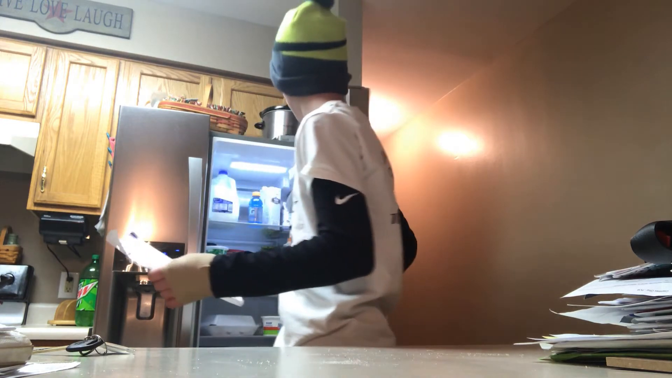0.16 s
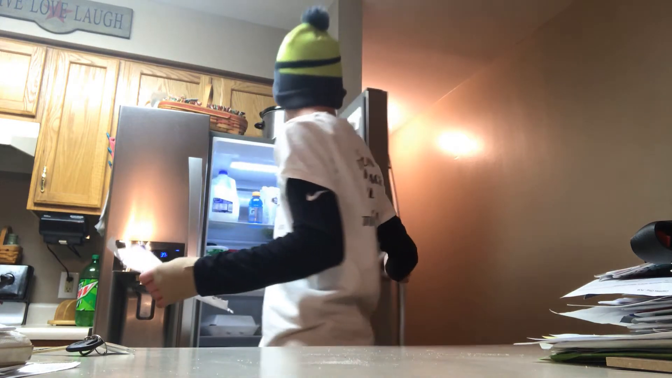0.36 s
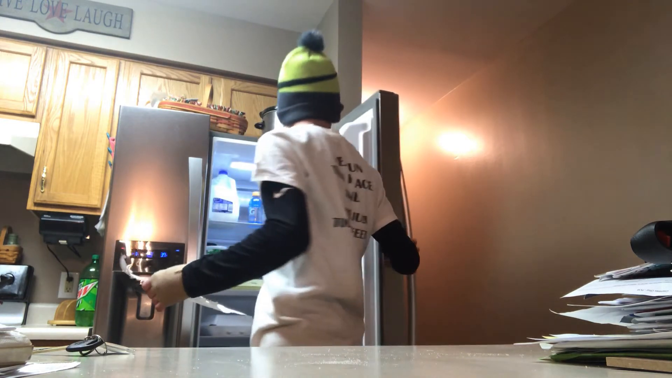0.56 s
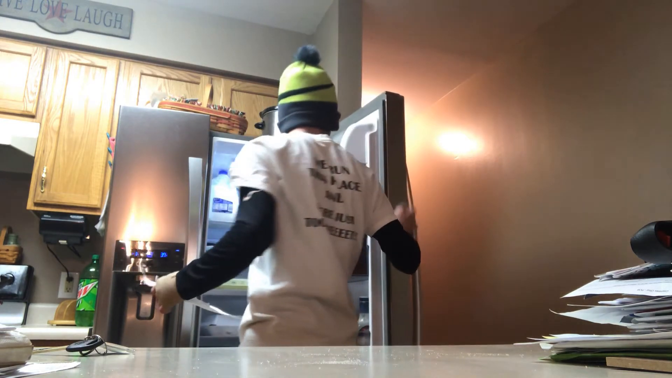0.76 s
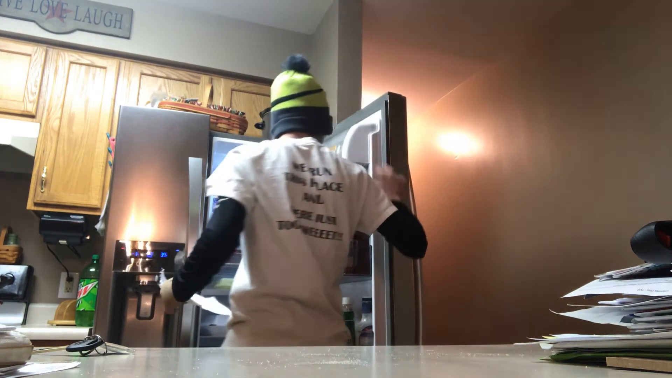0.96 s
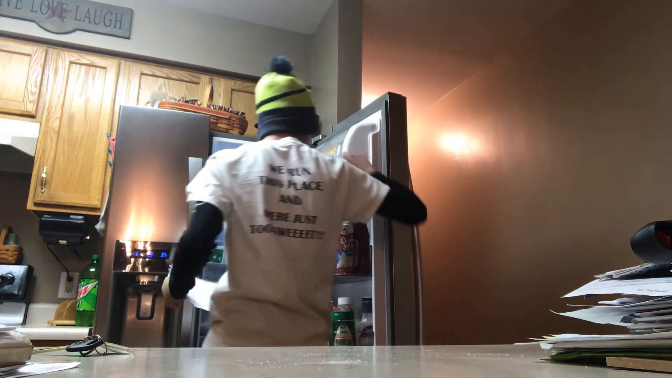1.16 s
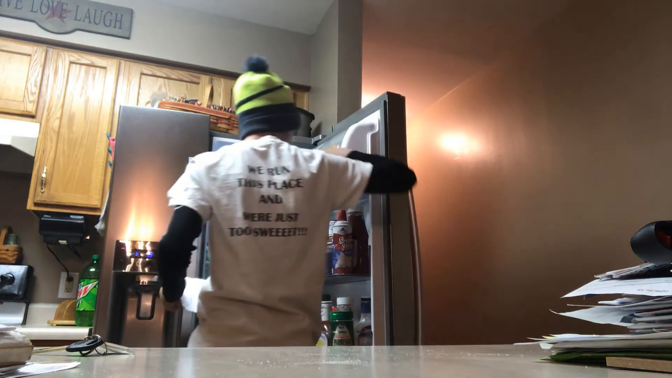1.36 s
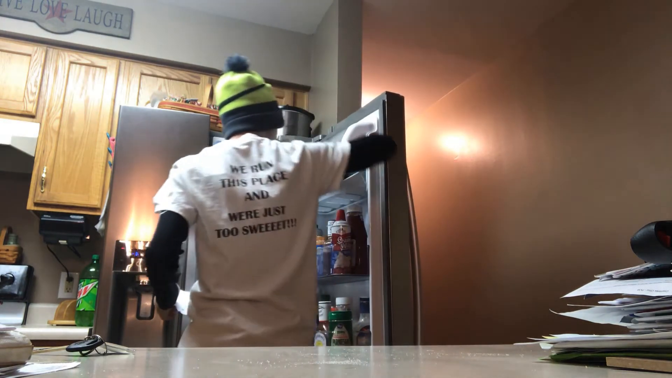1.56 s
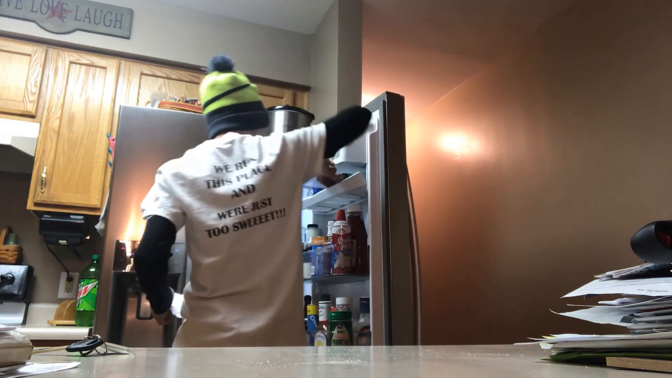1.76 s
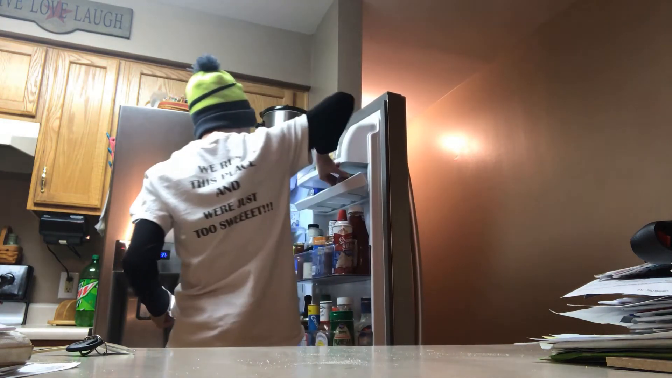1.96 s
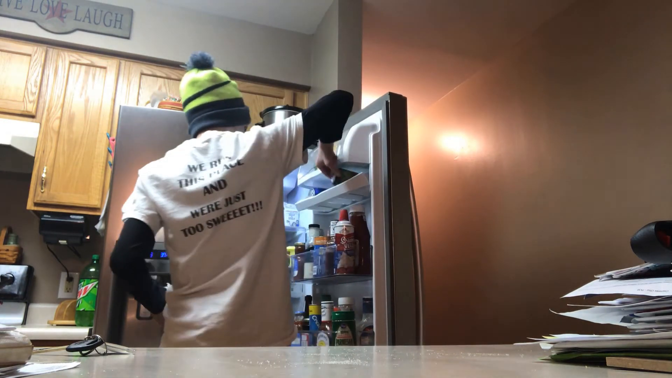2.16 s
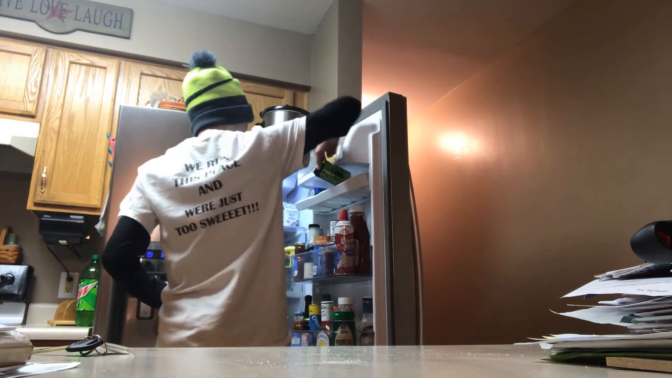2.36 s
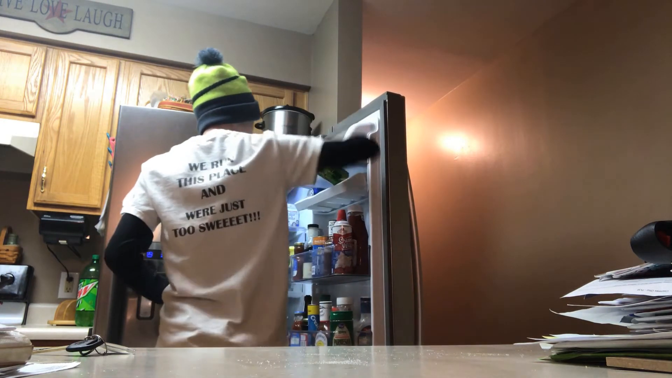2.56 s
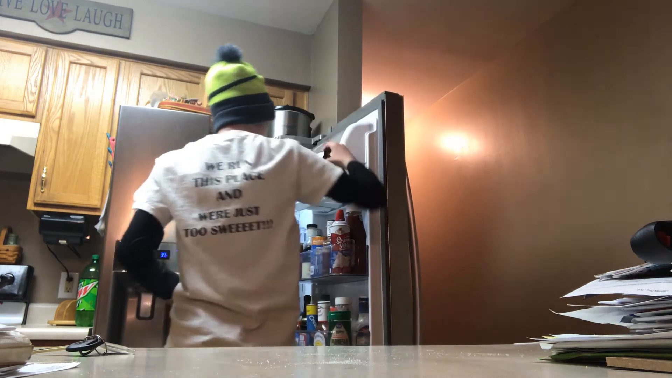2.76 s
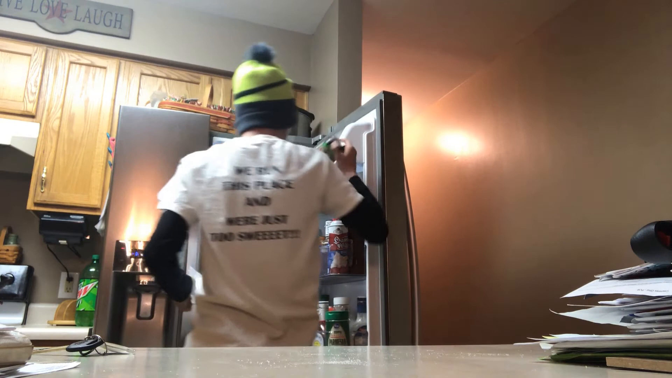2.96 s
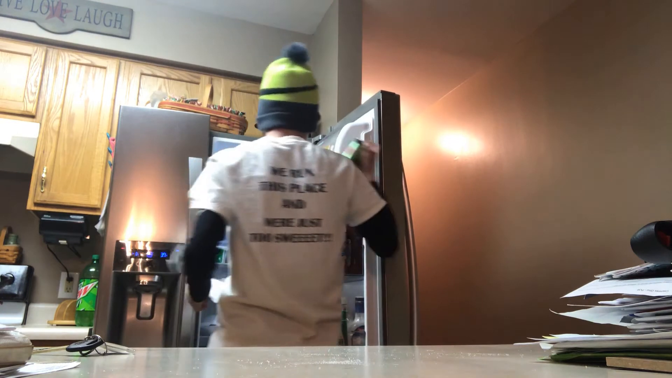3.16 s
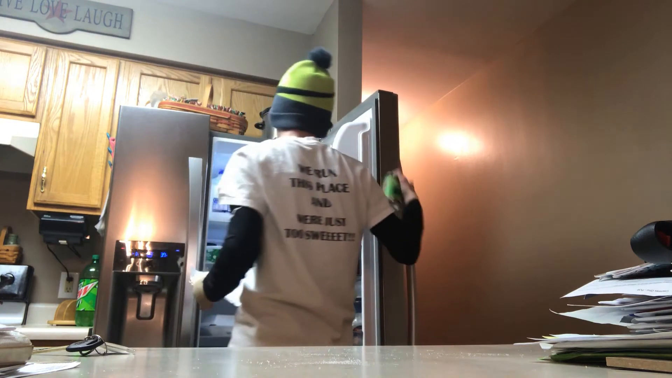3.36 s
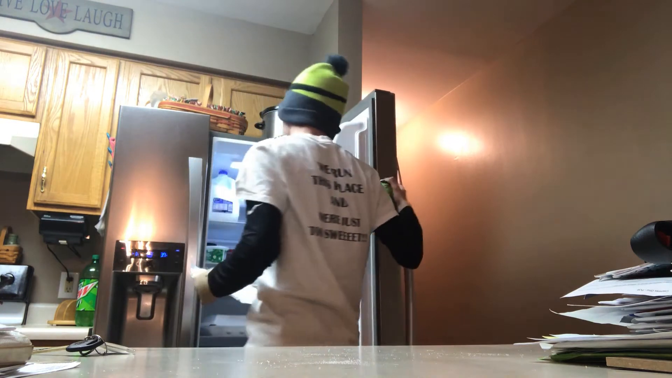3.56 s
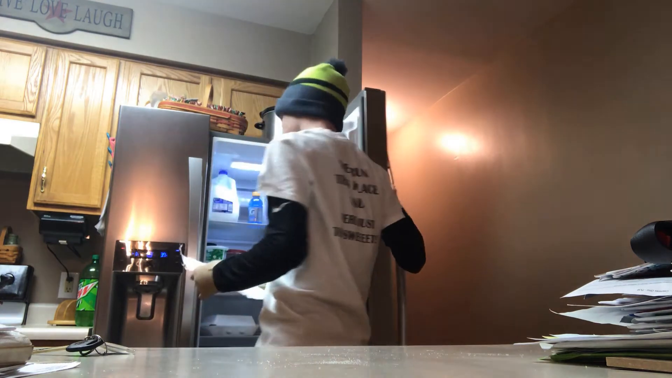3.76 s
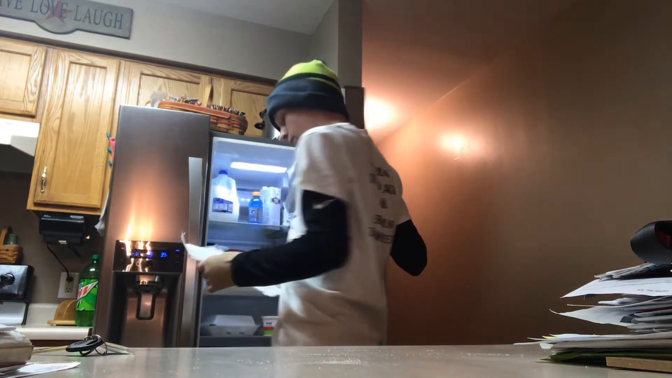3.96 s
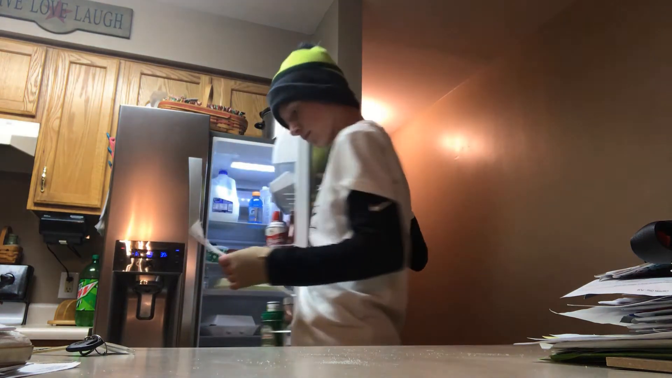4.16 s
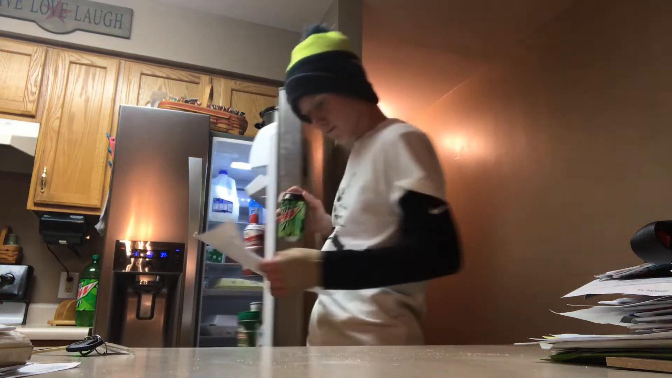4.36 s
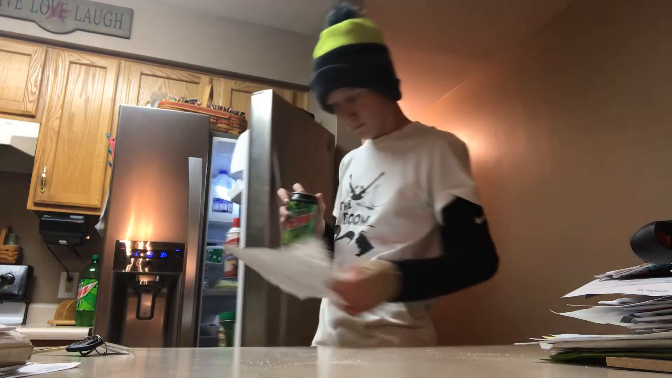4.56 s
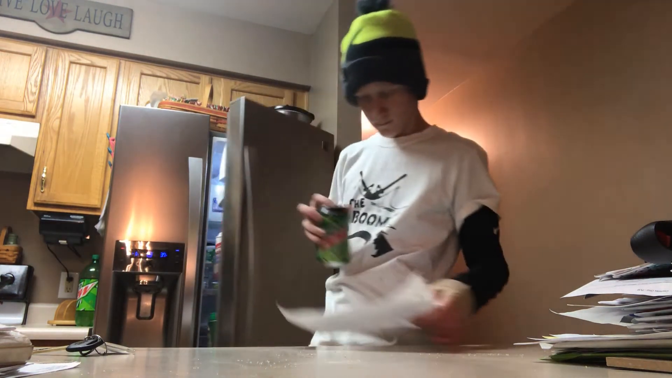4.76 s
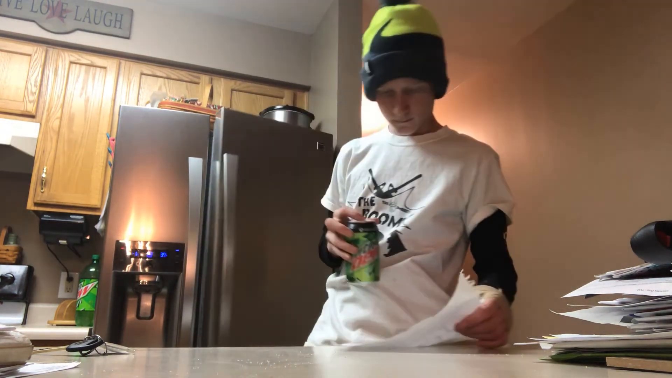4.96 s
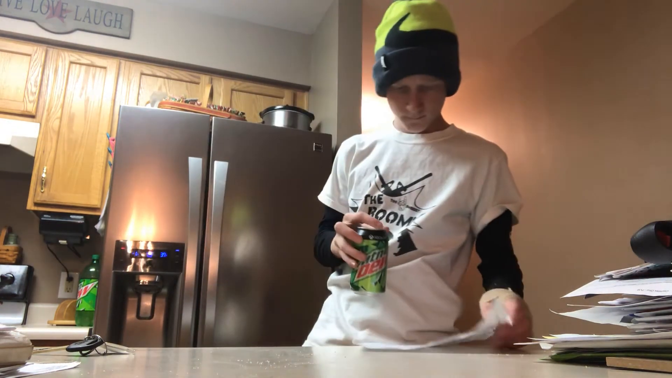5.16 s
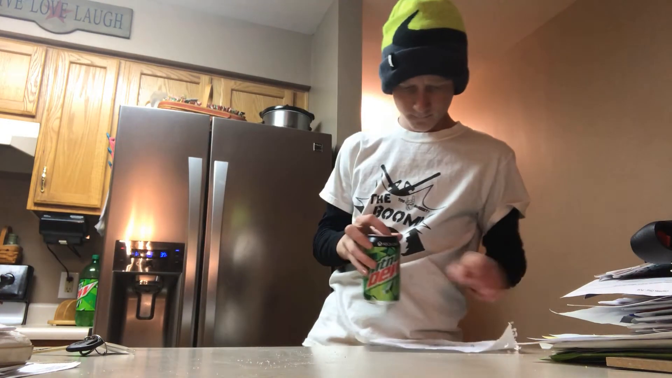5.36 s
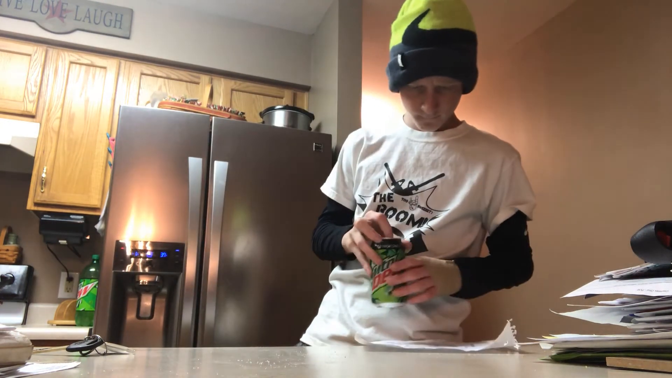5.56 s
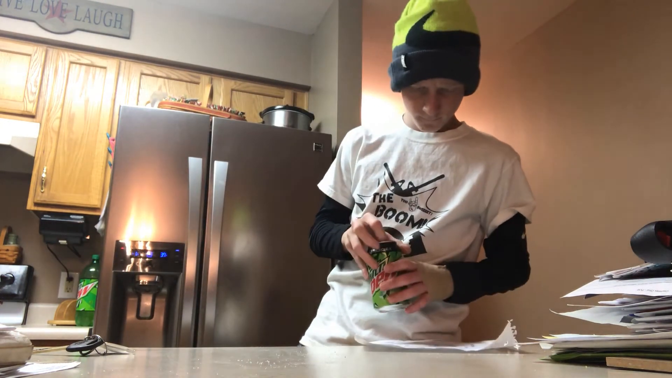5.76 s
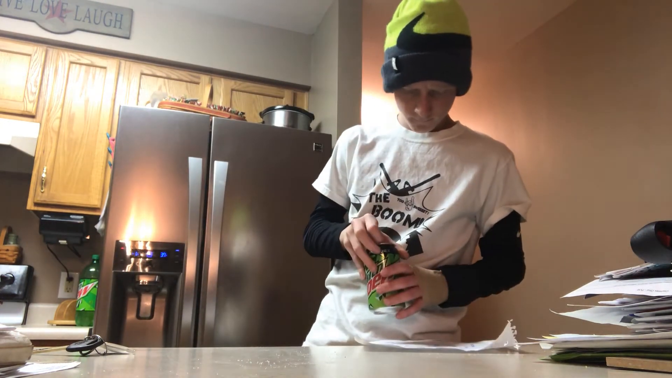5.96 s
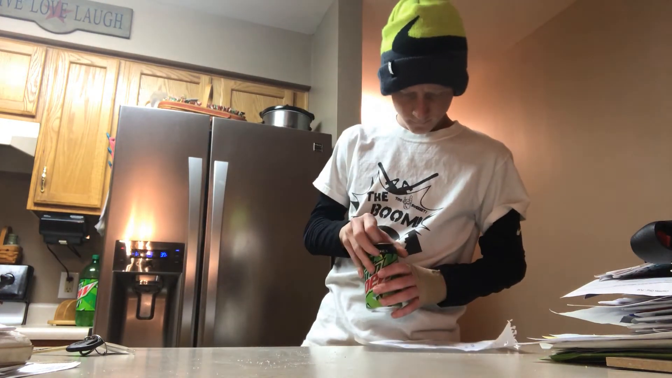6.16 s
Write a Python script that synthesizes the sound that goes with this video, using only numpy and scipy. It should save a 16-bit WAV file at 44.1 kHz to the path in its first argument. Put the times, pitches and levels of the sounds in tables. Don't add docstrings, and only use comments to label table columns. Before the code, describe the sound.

In a quiet home kitchen, faint steps and sleeve rustle lead to hollow plastic knocks as a can is pulled from a refrigerator door rack. A single shelf knock follows, then quiet handling and a paper snap. The door claps shut with a low thump, shelves and bottles rattling on. Close to the microphone, a can tab cracks sharply, hisses briefly and pops.

```python
import sys
import numpy as np
from scipy import signal
from scipy.fft import rfft, irfft, next_fast_len
from scipy.io import wavfile
from scipy.ndimage import map_coordinates

SR = 44100
rng = np.random.default_rng(int(sys.argv[2]) if len(sys.argv) > 2 else 0)


def rack_gain(trim_db):
    fader = np.asarray(trim_db, float)
    return 10 ** (fader / 20)


def wav_record(signal):
    frames = np.transpose(np.atleast_2d(signal))
    bounded = np.clip(frames, -1, 1)
    quanta = np.round(bounded * 32767).astype(np.int16)
    wavfile.write(sys.argv[1], SR, quanta)


N = 273464

# frequency_hz, density_db_per_hz
HUSH_SPECTRUM = [(15, -41), (25, 4.5), (97, 5.5), (161, -17.5), (545, -21.5), (641, -33), (1230, -5.5),
                 (1740, -18.5), (3450, -37), (5430, -28), (16000, -37)]
# start_s, level_db, pitch_hz, decay_t60_s
FOOTFALLS = [(0.015, -68, 79.5, .3), (0.204, -55, 38, .3), (0.451, -57, 60, .35), (0.961, -66, 60, .3),
             (1.205, -59, 56, 0.33), (2.959, -58, 49.6, .45), (3.457, -54, 68, 0.39),
             (3.886, -60, 61, 0.44), (4.15, -65, 122, 0.33), (4.735, -65, 71.6, 0.27),
             (4.872, -62, 96, .26)]
# peak_s, level_db, rise_s, fall_s, brightness_db
STROKES = [(0.02, -74.5, 0.091, 0.17, -10), (0.45, -74.5, 0.086, 0.13, 3), (1.02, -63.5, 0.11, 0.11, 6),
           (1.33, -70.5, 0.11, 0.32, 2.5), (1.85, -67.5, 0.17, 0.078, -5), (2.15, -54.5, .03, 0.2, 0),
           (2.37, -53.5, 0.18, 0.061, -1), (3.02, -63, 0.25, 0.24, 1), (3.49, -79, 0.052, 0.087, -13),
           (3.63, -66.5, 0.048, 0.065, 8.5), (4.68, -71.5, 0.25, 0.072, -12), (4.94, -62, 0.12, 0.66, -5.5),
           (5.06, -65, 0.072, 0.78, -11)]
# rest_db, gain_re_stroke_db, brightness_share, slam_rattle_db, rattle_fall_db_per_s
RUB_LAYERS = [
    (-77.5, -14, -0.68, -53.5, 15),
    (-78.5, -1, -0.26, -41, 31.5),
    (-79, -3, 0.82, -43.5, 45.5),
    (-78, -7.5, 0.94, -61, 58),
]
# frequency_hz, density_db_per_hz
RUMBLE_SPECTRUM = [(20, -36), (54, -2.5), (81, -1.5), (113, -2), (200, -3.5), (260, -16), (440, -120)]
PLASTIC_SPECTRUM = [(59, -50), (144, -8.5), (235, 3.5), (280, -5), (333, -1), (482, -5.5), (900, -9),
                    (1170, -28), (1980, -120)]
SCRAPE_SPECTRUM = [(350, -32), (600, -4), (768, -15), (870, 1), (1420, -1), (2250, -19), (4420, -25),
                   (7480, -120)]
RUSTLE_SPECTRUM = [(1180, -6.5), (2240, -8), (4380, -12.5), (7570, -17.5), (9170, -21), (10400, -21),
                   (14000, -22.5), (16000, -32.5)]
# centre_s,
# level_db, centre_hz, half_length_s
SCUFFS = [(0.05, -68, 1400, 0.026), (0.183, -64.5, 1300, 0.024), (1.86, -70, 1180, 0.048),
          (3.081, -67, 1900, 0.071), (4.193, -63.5, 1130, 0.036), (6.198, -50, 1320, 0.0079)]
# start_s, peak_db, crack_re_body_db, chatter_s
THUDS = [(0.19, -50.5, -10, 0.054), (0.218, -51, -35, 0.03), (0.351, -51.5, -21, 0.024),
         (0.452, -41, -24, 0.017), (0.736, -56, -30, 0.041), (0.965, -50, -2, 0.017),
         (1.815, -52.5, -14, 0.07), (2.633, -49, -2.5, 0.043), (2.919, -48.5, -33, 0.022),
         (3.848, -56, -32, 0.022), (4.788, -52.5, -21, 0.014)]
# start_s, peak_db, centre_hz, crack_re_body_db, chatter_s
BUMPS = [(0.889, -60, 1190, -16, 0.015), (1.029, -46, 420, -16, 0.017), (1.064, -48, 297, -17, 0.01),
         (2.059, -47.5, 1210, 1, 0.01), (2.517, -44, 1900, -15, 0.042), (2.889, -40.5, 1090, -5, .018),
         (3.433, -56.5, 563, -20, 0.01), (3.537, -48, 650, 9, 0.033), (4.641, -53, 507, -29, 0.011),
         (4.686, -47.5, 484, -2, 0.02), (5.154, -40.5, 424, -7, 0.019), (5.47, -37, 690, -25, 0.049),
         (5.648, -45, 236, -34, 0.03), (5.747, -61, 690, -27, 0.029), (5.802, -41.5, 560, -37, 0.0091)]
# start_s, level_db, pitch_hz, decay_t60_s
TOUCHES = [(0.19, -60, 420, 0.13), (0.455, -57, 348, .12), (0.74, -53, 406, 0.083),
           (0.453, -50, 1000, 0.057), (0.455, -62, 526, 0.093), (0.89, -62, 1150, .06),
           (1.003, -51, 294, 0.064), (1.03, -49, 1110, .05), (1.031, -48, 835, .05),
           (1.033, -53, 1400, 0.09), (1.062, -53, 690, .06), (1.064, -51, 1610, .05),
           (1.1656, -33, 850, 0.041), (1.166, -39, 1187, .06), (1.1683, -46, 1600, .06),
           (1.192, -30, 565, 0.11), (1.205, -38, 343, .12), (1.25, -42, 358, 0.088),
           (1.1675, -21, 562, 0.047), (1.28, -59, 1197, 0.18), (1.59, -40, 1375, 0.055),
           (1.592, -43, 974, .08), (1.592, -42.5, 654, 0.053), (1.593, -47, 1620, 0.057),
           (1.6, -51, 2130, 0.055), (1.61, -42.5, 328, 0.11), (1.752, -54, 306, 0.17),
           (1.843, -46, 347, 0.089), (1.846, -51, 950, 0.074), (1.848, -51, 1400, .06),
           (1.87, -50, 200, 0.12), (1.912, -48, 198, 0.11),
           (2.058, -49, 1520, 0.069), (2.096, -26.5, 353, 0.091), (2.1103, -32.5, 353, 0.088),
         (2.139, -33.5, 190, 0.12), (2.172, -38, 2090, .04), (2.174, -41, 2700, .05),
         (2.18, -32, 356, 0.14), (2.182, -35.5, 662, 0.18), (2.198, -35, 804, 0.094),
         (2.191, -27.5, 1390, .045), (2.192, -31, 1190, 0.072), (2.193, -29.5, 1900, 0.031),
         (2.195, -36, 352, .06), (2.22, -34.5, 183, 0.2), (2.264, -26.5, 1021, 0.18),
         (2.272, -25.5, 398, .1), (2.295, -34, 369, 0.11), (2.307, -27.5, 372.4, 0.13),
         (2.31, -30.5, 546, 0.13), (2.312, -41, 1020, 0.074), (2.515, -59, 830, 0.31),
         (2.52, -56.5, 1745, .15), (2.635, -50, 1053, 0.051), (2.649, -54.5, 238, 0.35),
         (2.907, -50, 1100, 0.09), (2.918, -50, 363.6, .35), (3.435, -61, 480, 0.12),
         (3.459, -58, 250, 0.092),
           (4.34, -62, 1250, .08), (4.43, -59.5, 1290, .06), (4.505, -61, 547, .2), (4.555, -54, 513, 0.18),
           (4.64, -55, 554, .12), (4.64, -66, 1490, .12), (4.69, -56, 950, .08), (4.788, -51.5, 517, 0.081),
           (4.788, -58, 950, .08), (4.788, -61, 1500, .15), (4.886, -51, 310, .12),
           (4.886, -42, 630, 0.054), (4.93, -58, 340, 0.18), (4.69, -49, 520, 0.14), (4.53, -59, 350, .2),
           (5.05, -49, 330, .1), (5.085, -54, 530, 0.17), (5.2032, -15, 2250, .014),
           (5.2036, -14.5, 2640, 0.013), (5.2035, -24, 823, 0.028), (5.2115, -23.5, 800, 0.028),
           (5.214, -17, 2680, .015), (5.152, -46, 560, .07), (5.17, -47, 292, .1), (5.182, -42, 950, 0.058),
           (5.255, -31, 277, .25), (5.385, -45.5, 243, 0.33), (5.39, -41, 502, .12), (5.48, -43, 607, 0.13),
           (5.35, -50, 1170, 0.32), (5.66, -48, 738, .15), (5.75, -52, 703, .12),
           (5.2045, -26.5, 7870, 0.014), (5.205, -29, 9500, 0.009), (5.206, -22, 678, 0.065),
           (5.208, -33.5, 1504, 0.096), (5.213, -33, 5600, 0.022), (5.294, -35, 2680, .03),
           (5.473, -35, 874, 0.072), (5.527, -42, 850, 0.069), (5.555, -35, 213, 0.095),
           (5.748, -51, 1040, .06), (5.803, -43.5, 690, 0.11), (5.803, -45, 1046, .06)]
# start_s, peak_db, centre_hz, chatter_s, tilt_db_per_octave
PAPER_SNAPS = [(0.5126, -48.5, 2730, .017, 4.5), (1.39, -54, 5200, 0.0097, 4),
               (1.492, -46.5, 3500, .017, -2), (1.893, -43.5, 3170, 0.009, -5.5),
               (3.021, -58, 2500, .0075, 0.5), (3.9296, -57.5, 2810, 0.031, 1),
               (4.854, -44, 6550, .0056, 3), (4.872, -37.5, 4200, 0.013, -2.5),
               (4.888, -29.5, 3600, 0.0031, -1.5), (5.5173, -44, 3100, 0.021, 2.5),
               (5.793, -63, 3260, .006, -14)]
# start_s, peak_db, centre_hz, chatter_s, tilt_db_per_octave
TIN_TICKS = [(1.4646, -51, 3540, 0.0097, -6), (2.684, -52, 3170, 0.014, -4), (2.832, -51, 3100, 0.016, 5.5),
             (2.969, -59, 4300, 0.0063, 4), (3.2777, -51.5, 5300, 0.0091, 4),
             (3.694, -53, 3300, 0.0075, -4.5), (3.969, -58, 5740, .0062, 8), (4.094, -58, 5430, 0.0091, 6),
             (4.3235, -53, 4500, 0.022, -2.5), (4.6114, -49.5, 2530, 0.0043, -5.5),
             (4.858, -36, 6300, .0045, 6.5), (5.3342, -39, 4280, 0.0083, -2)]
# start_s, peak_db
FILM_CRINKLES = [(2.35, -55), (2.515, -43.5), (3.2938, -52), (3.4493, -59), (3.507, -63), (4.177, -54),
                 (5.002, -52)]
# centre_hz, chatter_s, tilt_db_per_octave, ring_db
FILM_SOUND = (12000, 0.013, 5.2, 3)
# start_s, peak_db, centre_hz, chatter_s, tilt_db_per_octave
SEAL_CLAPS = [
    (5.2043, -19, 2500, .0005, -7),
    (5.2135, -27, 2500, .004, 4),
    (5.2945, -28, 2600, .0012, -8),
]
# frequency_hz, level_db
CRACK_SPECTRUM = [(800, -0.5), (2000, 2.5), (4000, 4), (7000, -5), (11000, -11.5), (16000, -16.5)]
# start_s, peak_db, crack_re_body_db, chatter_s, crack_tilt_db_per_octave; centre_hz, width_hz, level_db
BIN = ([(1.160, -32, -13, 0.0036, 5), (1.166, -22.5, -10.5, 0.0086, 2.5), (1.184, -34, -18, 0.012, -1)],
        [(243, 57, -13), (332, 62, -2), (574, 130, -2), (740, 120, -5.5), (845, 77, -4.5), (1190, 93, -7.5),
        (1560, 190, -10.5), (1900, 160, -39)])
JAR = ([(1.589, -38, -7, 0.02, -6.5)], [(330, 33, 0.5), (684, 110, -9), (970, 160, 0), (1520, 210, -1.5),
        (2070, 1300, -9.5)])
TRAY = ([(2.087, -34, 11, 0.0077, -3.5), (2.097, -30, -5, 0.02, -5), (2.134, -33.5, -1.5, 0.004, 11),
         (2.171, -32, 0, 0.013, -3.5), (2.192, -27, -4.5, 0.0052, 2), (2.224, -35.5, -27, 0.0036, -1.5)],
         [(348, 35, -0.5), (690, 48, -12.5), (950, 42, -15), (1180, 33, -13), (1410, 95, -10),
         (1900, 114, -21)])
RACK = ([(2.262, -21.5, -21, 0.0073, -10), (2.270, -22.5, -30, 0.011, -5.5),
         (2.283, -26.5, -35, 0.013, -1.5), (2.314, -25.5, -7.5, 0.0056, -9)], [(353, 40, 2), (600, 23, 2),
         (1000, 37, 0.5), (1210, 15, -5), (1460, 23, -5.5), (1920, 21, -22.5)])
SHELF = ([(3.578, -22, -19, 0.0048, -0.44), (3.590, -25, -26, 0.0079, -1.5)], [(335, 124, 1),
          (610, 180, 0.5), (798, 58, 6), (1050, 39, 0.5), (1250, 15, 1), (1480, 57, -4), (2040, 21, -17)])
DOOR = ([(5.181, -37, 0, 0.034, -3), (5.2035, -16.5, -5.5, 0.0025, 2.5), (5.210, -15.5, -10, 0.0038, 2.5),
         (5.226, -24.5, -28, 0.02, -12), (5.250, -23, -24, 0.016, -8), (5.294, -26.5, -16, 0.015, -14)],
         [(146, 27, 5), (183, 145, 1.5), (328, 55, 4), (484, 48, -3.5), (678, 134, 0), (895, 46, -2),
         (1000, 190, -4.5), (1400, 370, -32), (1900, 280, -30), (2500, 390, -12.5)])
# centre_hz, width_hz, level_db
CABINET_WALLS = [(210, 55, -9), (850, 4000, -23)]
# start_s, level_db, pitch_hz, decay_t60_s
GLASS = [(2.44, -62, 1880, 0.28), (2.517, -53, 1900, 0.18), (3.715, -69, 1870, 0.15),
         (3.76, -71.5, 1925, 0.6), (5.31, -47.5, 2005, 0.4), (5.41, -54, 1914, 0.38),
         (5.334, -58, 4480, 0.092), (5.585, -76, 3740, 0.82)]
# time_s, level_db
DOOR_SWING = [(4.49, -69), (4.53, -61.5), (4.63, -66), (4.65, -54.5), (4.77, -68), (4.79, -61), (4.85, -58),
              (4.95, -54.5), (5.2, -54.5)]
# frequency_hz, density_db_per_hz
HINGE_SPECTRUM = [(120, -27), (250, -5.5), (330, 6.5), (420, -4), (540, 4.5), (680, -16), (950, -9),
                  (1200, -19), (1500, -15), (1750, -40)]
# start_s, level_db, pitch_hz, decay_t60_s
CABINET_AIR = [
    (5.207, -15, 57.3, 0.16),
    (5.208, -18, 127, 0.11),
    (5.21, -24.5, 86.5, 0.2),
    (5.840, -44, 37.1, 0.26),
]
# centre_s, level_db
SHELF_SWINGS = [(5.3, -54), (5.395, -47.5), (5.44, -42), (5.51, -47.5), (5.565, -45.5), (5.67, -43),
                (5.73, -48.5), (5.82, -46.5), (5.991, -55.5)]
# start_s, peak_db, loudest_hz
TEARS = [
    (6.0044, -15, 3900),
    (6.0101, -25.5, 3900),
    (6.0144, -24, 5800),
    (6.019, -29, 5000),
    (6.026, -33, 5300),
]
# pitch_hz, level_db, decay_t60_s
LID_MODES = [(3010, -13, 0.018), (3810, 1.5, 0.0061), (4300, -2, .004), (4900, -10, 0.0078),
             (5900, -5, .01), (6640, -7, 0.012), (8340, -3.5, 0.0067), (9550, -4, 0.0052), (11900, 3, .003),
             (14200, 13, 0.0036)]
# time_s, level_db
VENT = [
    (6.035, -49.5),
    (6.07, -37),
    (6.125, -38.5),
    (6.15, -42),
    (6.2, -52),
]
# frequency_hz, density_db_per_hz
LOW_JET_SPECTRUM = [(470, -45), (1150, -12), (2620, -8), (3020, 4), (4800, 8), (8000, -5), (10400, -9),
                    (17600, -120)]
HIGH_JET_SPECTRUM = [(3530, -60), (6000, -8.5), (8750, -6), (10500, -8.5), (11200, -1), (12600, -8.5),
                     (14200, -2.5), (15200, -5), (16100, -16.5)]
# start_s, peak_db, then modes of pitch_hz, level_db, decay_t60_s
FLAP_POP = (6.1745, -20, [(1500, 9.5, 0.018), (2900, -9, 0.027), (2170, -24, 0.0055)])
# frequency_hz, decay_t60_s
ROOM_DECAY = [(100, 0.59), (500, 0.39), (2000, 0.34), (6000, 0.35), (14000, 0.24)]
# centre_hz, width_hz, depth_0_to_1
MIC_PORT = (10360, 860, 0.35)

CLOCK_S = np.arange(N) / SR
T = np.arange(SR // 2) / SR


def unit(x):
    return x / np.sqrt(np.mean(x ** 2) + 1e-20)


def peak(x, db):
    return rack_gain(db) * x / np.abs(x).max()


def add(track, s, sound):
    part = track[round(s * SR):][:len(sound)]
    part += sound[:len(part)]


def along(points, hz):
    f, v = np.transpose(points)
    return np.interp(np.log(hz + 1), np.log(f + 1), v)


def envelope(rows):
    s, db = np.transpose(rows)
    return rack_gain(np.interp(CLOCK_S, s, db, -150, -150))


def filtered(x, response):
    n = x.shape[-1]
    m = next_fast_len(n + 4096)
    spectrum = rfft(x, m) * response(np.fft.rfftfreq(m, 1 / SR))
    return irfft(spectrum, m)[..., :n]


def wander(count, rate_hz):
    return map_coordinates(rng.standard_normal(count), [np.arange(N) * rate_hz / SR])


def rush(spectrum, grain_db, grain_rate):
    lumps = wander(N // 20, grain_rate)
    grains = rng.standard_normal(N) * rack_gain(grain_db * lumps)
    return unit(filtered(grains, lambda hz: rack_gain(along(spectrum, hz))))


def ring(modes):
    return sum(rack_gain(db - 60 * T / t60) * np.sin(2 * np.pi * hz * T) for hz, db, t60 in modes)


def tones(table, rise):
    out = np.zeros(N)
    for s, db, hz, t60 in table:
        add(out, s, ring([(hz, db, t60)]) * (1 - np.exp(-T / rise)))
    return out


def chatter(length, sharp):
    length = np.clip(length, .0004, .06)
    x = rng.standard_normal(SR // 8) * np.exp(-T[:SR // 8] / length)
    x[0] += sharp * np.sqrt(length * SR)
    return x / np.linalg.norm(x)


def crack(length, tilt_db, centre_hz=4000, lobe_db=-30):
    def response(hz):
        tilted = rack_gain(along(CRACK_SPECTRUM, hz) + tilt_db * np.log2(hz / 4000 + 0.02))
        lobe = 1 + rack_gain(lobe_db) / (1 + ((hz - centre_hz) / (0.029 * centre_hz)) ** 2)
        return tilted * lobe
    return filtered(chatter(length, sharp=0.18), response)


def resonate(x, peaks, scatter):
    moved = []
    for centre, width, db in peaks:
        moved.append((centre * (1 + scatter * rng.standard_normal()), max(width, 25 + centre / 16), db))

    def response(f):
        body = 0
        for k, (c, w, db) in enumerate(moved):
            body = body + (-1) ** k * rack_gain(db) * 1j * f * w / (c * c - f * f + 1j * f * w)
        return body / (1 + 1j * f / 3500) ** 2
    return filtered(x, response)


def hush():
    return rack_gain(-74) * rush(HUSH_SPECTRUM, grain_db=-2.0, grain_rate=29)


def footfalls():
    return rack_gain(-1.0) * tones(FOOTFALLS, rise=0.014)


def effort(rest_db, gain_db, share, rattle_db, fall_db):
    slam_s, stroke_drop_db = 5.22, 12
    since = CLOCK_S - slam_s
    gain = rack_gain(rest_db) + (CLOCK_S > slam_s) * rack_gain(rattle_db - fall_db * since)
    for s, db, rise, fall, bright_db in STROKES:
        distance = np.maximum((s - CLOCK_S) / rise, (CLOCK_S - s) / fall)
        gain += rack_gain(db + gain_db + share * bright_db - stroke_drop_db * distance)
    return gain


def rubbing():
    rumble, plastic, scrape, rustle = [effort(*layer) for layer in RUB_LAYERS]
    x = rumble * rush(RUMBLE_SPECTRUM, grain_db=1.5, grain_rate=15)
    x += plastic * rush(PLASTIC_SPECTRUM, grain_db=2, grain_rate=40)
    x += scrape * rush(SCRAPE_SPECTRUM, grain_db=2.5, grain_rate=99)
    return x + rustle * rush(RUSTLE_SPECTRUM, grain_db=1, grain_rate=96)


def scuffs():
    out = np.zeros(N)
    for s, db, hz, half in SCUFFS:
        noise = rng.standard_normal(len(T))
        band = unit(filtered(noise, lambda f: 1 / (1 + (np.log(f / hz + 1e-3) / 0.39) ** 4)))
        lead = 2 * min(half, s / 2)
        add(out, s - lead, rack_gain(db) * band * np.exp(-((T - lead) / half) ** 2))
    return out


def bumps():
    out = np.zeros(N)
    thuds = [(s, db, 355, *rest) for s, db, *rest in THUDS]
    for s, db, hz, crack_db, length in sorted(BUMPS + thuds):
        body = [(hz * 0.49, hz * 0.3, -6), (hz, hz * 0.22, 0), (hz * 1.546, hz * 0.2, -4),
                (hz * 2.86, hz * 0.79, -12)]
        add(out, s, peak(resonate(chatter(length, sharp=0.2), body, scatter=0.016), db))
        add(out, s, peak(crack(length, tilt_db=-3.5), db + crack_db))
    return out


def touches():
    return tones(TOUCHES, rise=0.0013)


def clicks():
    out = np.zeros(N)
    events = [(*row, -7) for row in PAPER_SNAPS]
    events += [(*row, 11) for row in TIN_TICKS]
    events += [(*row, *FILM_SOUND) for row in FILM_CRINKLES]
    events += [(*row, 8) for row in SEAL_CLAPS]
    for s, db, hz, length, tilt_db, lobe_db in events:
        add(out, s, peak(crack(length, tilt_db, hz, lobe_db), db))
    return out


def knocks():
    out = np.zeros(N)
    for blows, peaks in BIN, JAR, TRAY, RACK, SHELF, DOOR:
        for s, db, crack_db, length, tilt_db in blows:
            touch = chatter(length, sharp=0.37)
            body = resonate(touch, peaks, scatter=0.0031) + resonate(touch, CABINET_WALLS, scatter=0.17)
            add(out, s, peak(body, db))
            add(out, s, peak(crack(1.54 * length, tilt_db), db + crack_db))
    return out


def bottles():
    return tones(GLASS, rise=0.0027)


def door_swing():
    return envelope(DOOR_SWING) * rush(HINGE_SPECTRUM, grain_db=5.5, grain_rate=44)


def door_thump():
    return tones(CABINET_AIR, rise=0.0068)


def shelf_hum():
    pitch_hz = 160 + 9 * wander(300, rate_hz=30)
    half_s = 0.026
    swings = sum(rack_gain(db) * np.exp(-((CLOCK_S - s) / half_s) ** 2) for s, db in SHELF_SWINGS)
    return swings * np.sqrt(2) * np.sin(2 * np.pi * np.cumsum(pitch_hz) / SR)


def tab():
    out = np.zeros(N)
    high_pass = signal.butter(4, 2700, "high", fs=SR, output="sos")
    for s, db, centre_hz in TEARS:
        lid = ring([(hz, level - 7 * np.log2(hz / centre_hz) ** 2, t60) for hz, level, t60 in LID_MODES])
        tear = signal.fftconvolve(lid, chatter(0.00034, sharp=1.4))
        add(out, s, peak(signal.sosfilt(high_pass, tear), db))
    counter_s, counter_db = .00165, -7.5
    return out + rack_gain(counter_db) * np.roll(out, round(counter_s * SR))


def gas():
    puff_s, puff_db, puff_fall_db_per_s = 6.008, -38.5, 190
    since = CLOCK_S - puff_s
    puff = (since > 0) * rack_gain(puff_db - puff_fall_db_per_s * np.abs(since))
    jet = envelope(VENT)
    low = puff + rack_gain(-16.5) * jet
    high = jet + rack_gain(-7) * puff ** 2 / rack_gain(puff_db)
    out = low * rush(LOW_JET_SPECTRUM, grain_db=5.5, grain_rate=420)
    out += high * rush(HIGH_JET_SPECTRUM, grain_db=0.5, grain_rate=330)
    return out + rack_gain(-21) * jet * rush(RUSTLE_SPECTRUM, grain_db=-0.5, grain_rate=150)


def flap():
    out = np.zeros(N)
    s, db, modes = FLAP_POP
    add(out, s, peak(ring(modes) * (1 - np.exp(-T / 0.00039)), db))
    return out


def kitchen(x):
    out, step = np.zeros(N), SR // 4
    for k in range(0, N, step):
        hz, t, z = signal.stft(rng.standard_normal(SR * 3 // 4), SR, nperseg=256)
        decay = rack_gain(-60 * t / along(ROOM_DECAY, hz)[:, None])
        tail = signal.istft(z * decay, SR, nperseg=256)[1]
        tail *= 1 - np.exp(-np.arange(len(tail)) / SR / 0.0017)
        add(out, k / SR, signal.fftconvolve(x[k:k + step], tail / np.linalg.norm(tail)))
    return out


def scene():
    small = signal.butter(4, 120, "high", fs=SR, output="sos")
    far = signal.sosfilt(small, bumps() + clicks() + knocks()) + bottles()
    near = signal.sosfilt(small, tab() + gas() + flap())
    touch = touches()
    thump = footfalls() + door_thump()
    wet = kitchen(rack_gain(-5) * far + rack_gain(-14.5) * near + rack_gain(-7.5) * thump + rack_gain(-16.5) * touch)
    friction = rubbing() + scuffs() + door_swing() + shelf_hum()
    return (far + near + touch + thump + wet + friction + hush())[None]


def roll_off(x):
    return signal.sosfilt(signal.butter(12, 16540, fs=SR, output="sos"), x)


def record(dry):
    centre_hz, width_hz, depth = MIC_PORT

    def response(hz):
        bass = hz ** 3 / (hz ** 3 + 30 ** 3)
        notch = 1 - np.clip(depth, 0, 1) / (1 + ((hz - centre_hz) / width_hz) ** 2)
        return (hz < 16040) * bass * notch
    mix = filtered(dry, response)
    return roll_off(mix)


dry = scene()
out = record(dry)
wav_record(out)
```